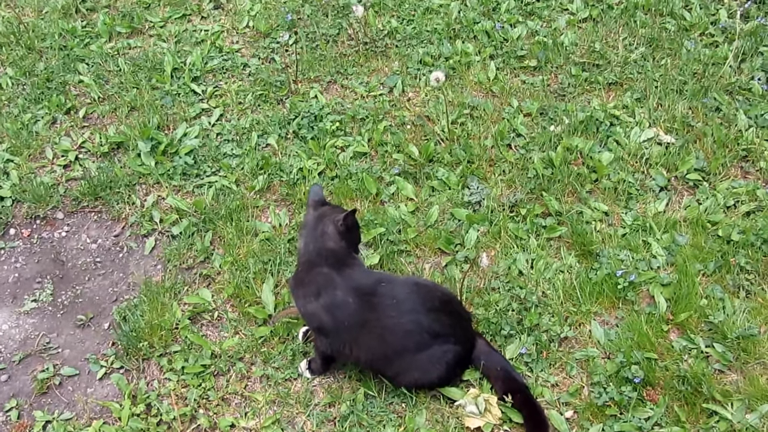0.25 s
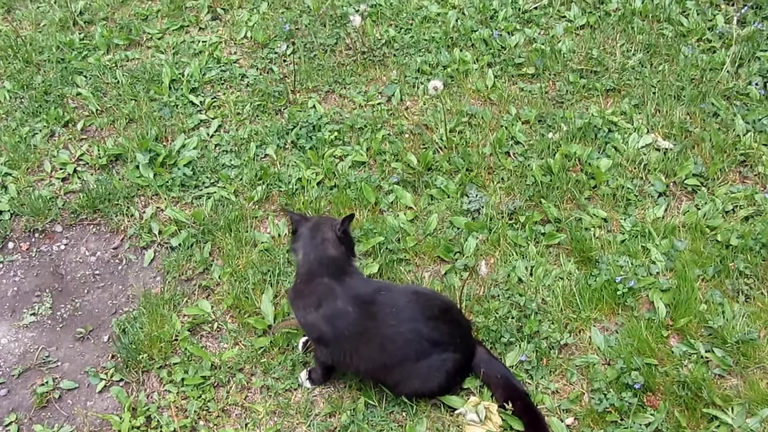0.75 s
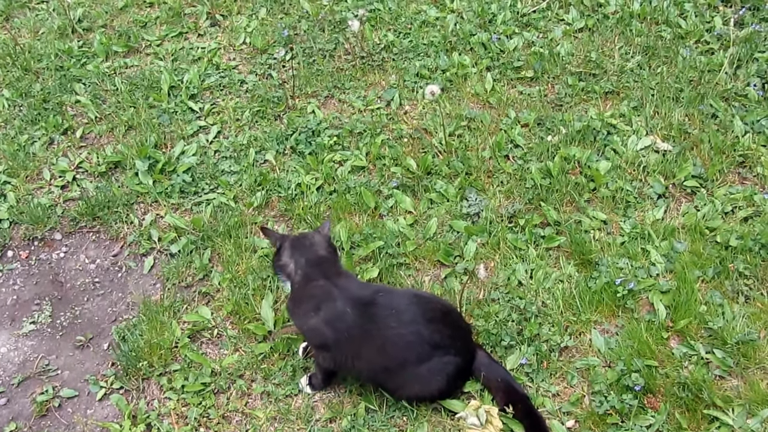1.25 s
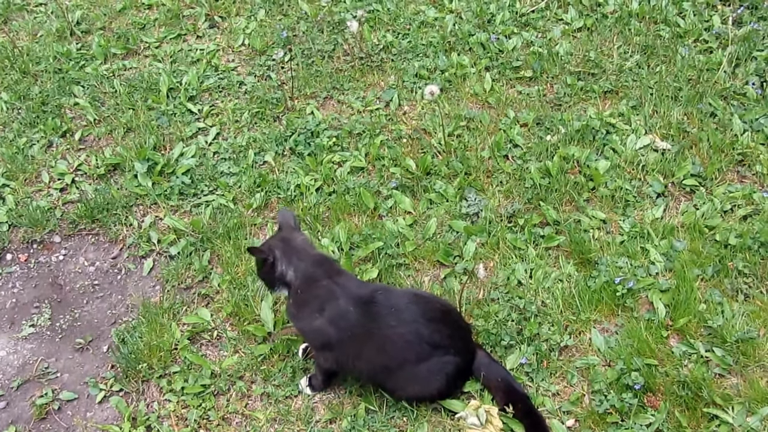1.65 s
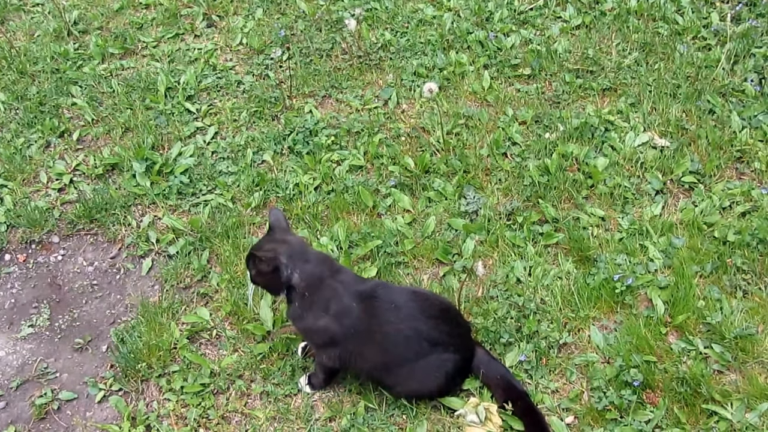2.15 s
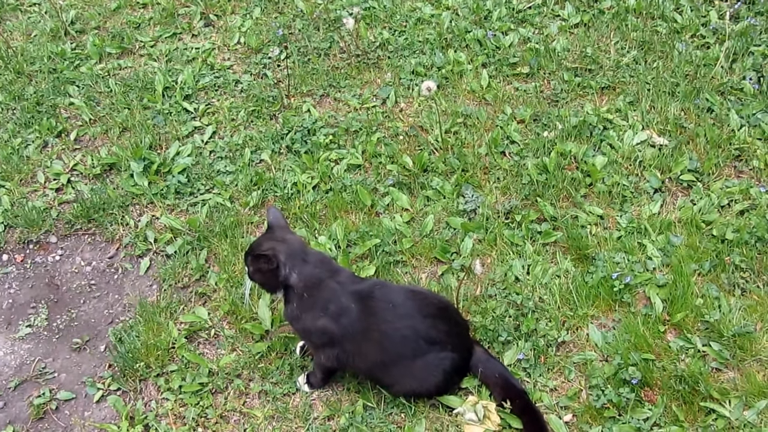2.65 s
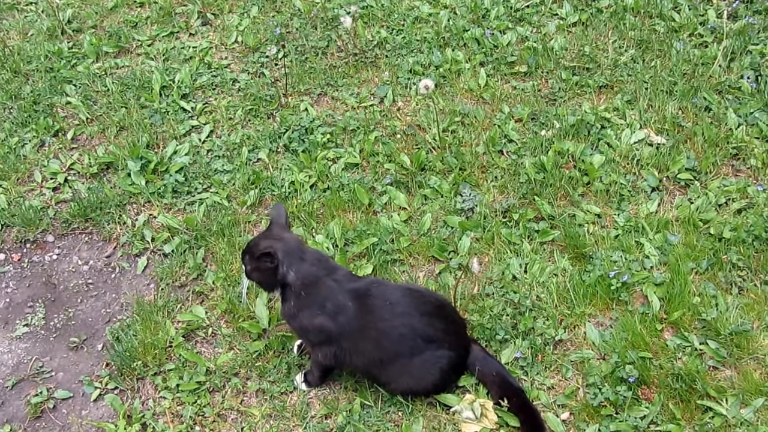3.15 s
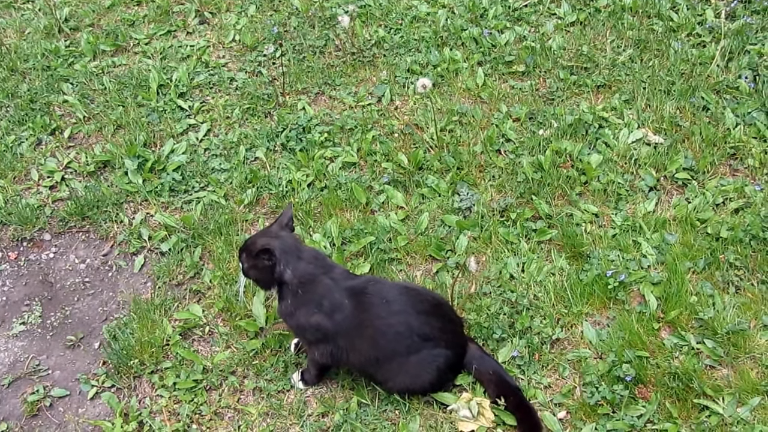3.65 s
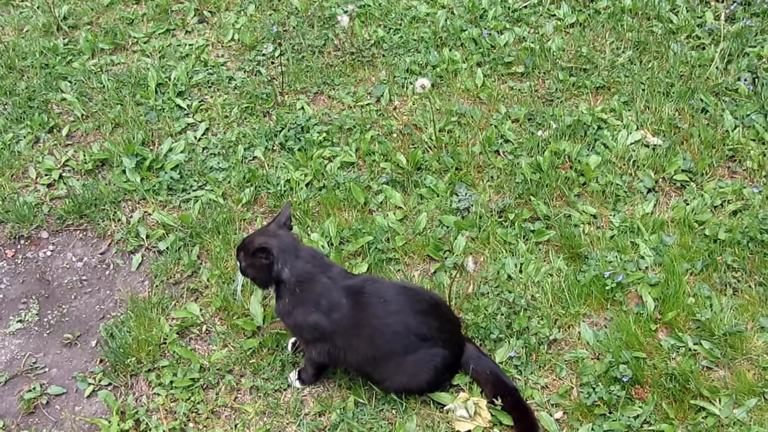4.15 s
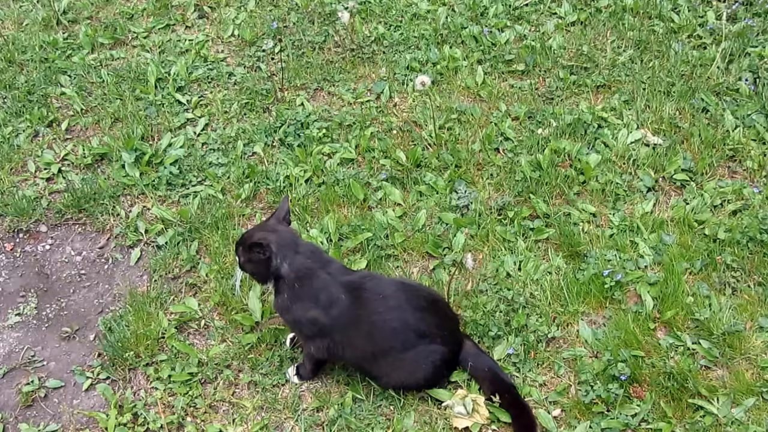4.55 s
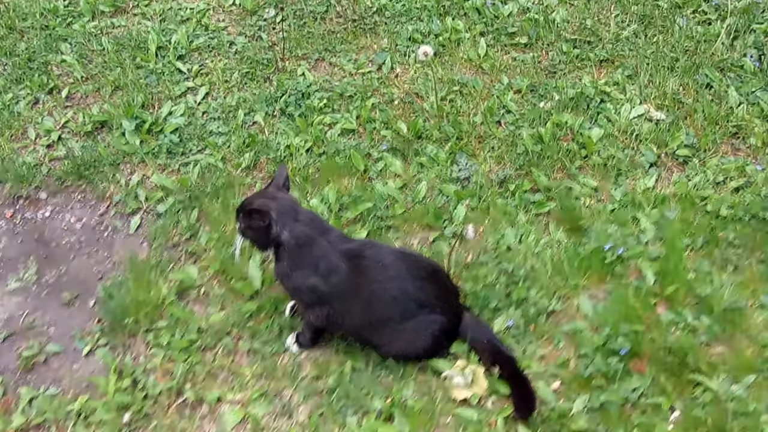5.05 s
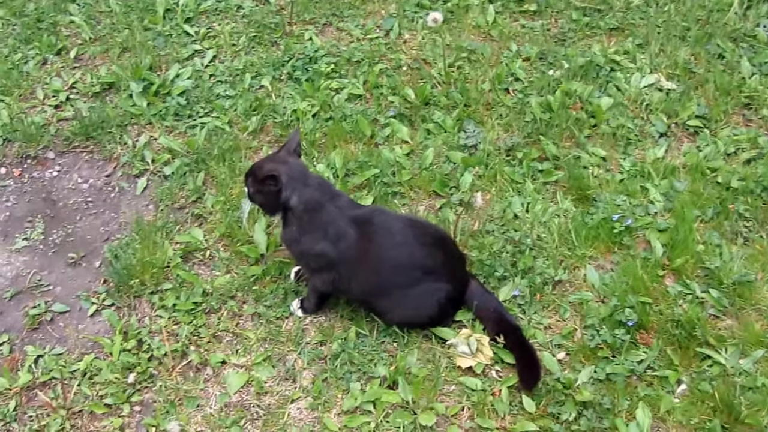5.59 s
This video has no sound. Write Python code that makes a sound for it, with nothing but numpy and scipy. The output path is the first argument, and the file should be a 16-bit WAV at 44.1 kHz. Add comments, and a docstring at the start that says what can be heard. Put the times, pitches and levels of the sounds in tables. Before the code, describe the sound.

Outdoors in a grassy garden, a big car engine some distance away throbs softly and unevenly, emerges more openly and brightly at about a second and a half, then settles into a steady deep boom. Soft tyre and traffic roar lies beneath it. Faint thin squeaks and small grassy rustles appear nearby. Stereo pickup from a small handheld device with close microphones.

```python
"""A soft roar of tyres and far traffic over low, still air, with the uneven burble of a big eight-cylinder engine.
The engine rolls along at idle some way from a garden; its firings are pulses that ring exhaust resonances.
It comes briefly into the open, then settles into a steadier boom, a cosine at the firing rate; belt-driven
tones waver above it. Faint squeaks, rustles and swells of hiss are shaped from noise.
All is heard through a closely spaced pair of microphone ports, as phase and level differences."""
import sys
import numpy as np
from scipy import signal
from scipy.fft import rfft, irfft
from scipy.io import wavfile
from scipy.ndimage import uniform_filter1d

SR = 44100
rng = np.random.default_rng(int(sys.argv[2]) if len(sys.argv) > 2 else 0)


def unload_audio(sound):
    """Save the sound as a 16-bit wav file, at the path given as the first command line argument."""
    columns = np.transpose(np.atleast_2d(sound))
    # keep every value between -1 and 1, then stretch to whole-number steps
    steps = np.round(np.clip(columns, -1, 1) * 32767)
    wavfile.write(sys.argv[1], SR, steps.astype(np.int16))


N = 256793
TIME = np.arange(N) / SR  # s
FREQS = np.maximum(np.arange(N // 2 + 1) * SR / N, 1)  # Hz, kept above 0 for logarithms

# In every swell, half_width_s runs from the peak to 13.5 % of it.
# Spectrum of the still air: frequency_hz, relative_density_db
AIR_COLOUR = [(20, -25.5), (38, -17), (55, -2.5), (100, 4), (160, 0.5), (230, -12), (420, -17.5),
              (1000, -28.5), (3500, -33.5), (5500, -41.5), (8000, -48), (10500, -58.5), (12000, -69),
              (15500, -69.5)]
AIR_DB = -33
# Spectrum of the hiss: frequency_hz, relative_density_db
HISS_COLOUR = [(2500, -19.5), (4000, 2.5), (5200, 4.5), (5650, 5.5), (6200, -3), (7800, -8), (9500, -25),
               (12000, -53.5)]
# Faint hiss, strongest while the car is in the open: centre_s, half_width_s, level_db
HISS_SWELLS = [(.15, 0.93, -64.5), (1.72, 0.35, -55), (2.9, 0.21, -61), (4.173, 0.34, -61.5),
               (4.638, 0.087, -61)]
# Rustles in the garden: centre_s, half_width_s, low_hz, high_hz, level_db
RUSTLES = [(4.745, .015, 3700, 4400, -56), (4.795, .025, 2300, 3000, -45), (5.0, .022, 2600, 3200, -44),
           (5.066, .046, 3280, 3760, -46.5), (5.08, .04, 2100, 2900, -41.5), (5.105, .012, 3600, 4000, -53),
           (5.15, .05, 3300, 3750, -54), (5.52, .02, 3350, 3700, -53), (5.6, .025, 3300, 4100, -51.5),
           (5.71, .018, 3300, 3750, -52.5)]
# Thin squeaks: centre_s, half_width_s, pitch_hz, width_hz of each of two resonances, level_db
SQUEAKS = [(1.702, 0.03, 5590, 130, -55), (1.74, .15, 5575, 50, -61.5), (1.795, 0.014, 5850, 380, -53),
           (2.05, .16, 3300, 350, -55), (2.94, 0.025, 5300, 250, -60), (3.035, 0.028, 2650, 330, -41),
           (3.73, .025, 2300, 250, -42)]

# Spectrum of tyres and traffic before shaping: frequency_hz, relative_density_db
ROAR_COLOUR = [(150, -6), (240, -7.5), (420, -4.5), (560, -0.5), (760, 0.5), (970, 3.5), (1300, 0),
               (1700, -6), (2050, -10.5), (2500, -10), (3200, -20), (4200, -35.5), (5600, -34), (8000, -64),
               (12000, -76.5)]
# Swells of the roar: centre_s, half_width_s, lift_db, treble_lift_db
ROAR_SWELLS = [(1.168, 0.4, 2.5, 0), (1.74, 0.32, 3.5, -1), (1.796, 0.088, 0.2, -1.5),
               (2.694, 0.054, 2.6, -1.5), (2.943, 0.21, 0.9, 3), (3.42, 0.13, 2, -0.5),
               (4.215, 0.31, 1.2, -1), (4.86, 0.22, 1.2, -0.5), (5.1, 1, 2, 2)]
# Resonant rings from one stretch of road to the next: centre_s, half_width_s, pitch_hz, width_hz, lift_db
ROAR_RINGS = [(.4, 1, 1640, 350, 2.2), (.7, 1.5, 234, 45, 8), (1.72, 0.3, 524, 130, 5),
              (1.79, 0.14, 1260, 360, 4.5), (2.248, .3, 348, 70, 4.5), (2.852, .55, 1305, 220, 3.5),
              (3.853, 0.67, 957, 110, 2), (3.9, 0.5, 2590, 402, 3.5), (4.935, 0.62, 1230, 270, 4),
              (5.508, .38, 690, 230, 3.5)]
# Path of the road noise: time_s, left_minus_right_db, cancelled_share (below 0 the ground reflection adds)
ROAD_PATH = [(0, 0.8, -1), (1.3, -1, 0.52), (1.75, 2.5, 0.075), (2.3, 1, 0.44), (4, -0.3, 0.57),
             (5.82, -1.5, 1)]
GROUND_DIP_HZ, GROUND_DIP_WIDTH_HZ = 391, 195
ROAR_DB, ROAR_FOLLOWS = -31, 0.78  # base level when nearest, share of the car's level swing

# Microphone ports: frequency_hz, left_lead_rad, left_minus_right_db, direct_power_share (0-1)
PORTS = [(56, 1.98, -2, 1), (90, 1.42, -1.5, 0.9), (164, 1.02, 2.5, 0.66), (310, 1.04, 2.5, 0.88),
         (464, 1.32, 2.5, 0.85), (610, 0.38, 5, 0.53), (920, 0.27, 5, 0.58), (1240, 1.5, 6, 0.24),
         (1750, 0.94, 4, 1), (2240, 1.41, -1, 0.7), (2680, 2.02, 4.5, 0.74), (4400, 2, 1.5, 0.2),
         (6140, 5.6, 3, 0.1), (8000, 3.1, 0.5, 0.13)]
# Wall echo of the burble: time_s, delay_s, level_db relative to the direct sound
WALL_ECHO = [(0, .0315, -15), (5.82, .0434, -16)]
NEAREST_S, PASS_S = 3.04, 2.06  # nearest point, time to cover its own distance from the garden

# Belt-driven fan and pumps: pitch_hz, relative_level_db when nearest, multiple of the car's level swing
BELT_TONES = [(47.0, -57, 1), (119.9, -38.5, 1), (141.4, -44, 1.5), (162, -52, 1), (192.7, -45, 1.5),
              (212, -55, 4), (260, -55, 2), (283.2, -46.5, 3.5), (298.6, -51, 3), (306, -54, 2.5),
              (353, -58, 2), (376.3, -61, 1)]
BELT_DB, SCREENED_DB = 0.5, -4  # offset of all belt tones, further offset while screened
EMERGE_S, EMERGE_LENGTH_S = 1.4, 0.16  # middle and time scale of coming into the open

# Engine speed: time_s, four_stroke_cycles_per_s
SPEED = [(0, 11.32), (.8, 11.32), (1.25, 11.45), (1.5, 11.41), (1.8, 11.25), (2.6, 11.225), (3.4, 11.19),
         (3.9, 11.155), (5.82, 11.155)]
# Strength of the eight firings of one cycle, in order: level_db
CYLINDER_DB = [-.5, -8.1, -3.5, -6.2, -3.4, -3.7, -8.4, -5.4]
FIRST_FIRING = .857  # cycles
# Hollow drone of the silencer, before its waver: time_s, level_db
DRONE = [(0, -49.5), (1.2, -49.5), (1.65, -36), (1.87, -43), (2.1, -38), (2.42, -37.5), (2.56, -50.5),
         (2.75, -40), (3.2, -39.5), (3.47, -52.5), (3.85, -38), (4.5, -58.5), (4.7, -39.5), (5, -56.5),
         (5.82, -48.5)]
DRONE_HZ, DRONE_WIDTH_HZ = 287, 30
# Exhaust resonances: pitch_hz, width_hz, relative_level_db, share of the brightness that lifts it
EXHAUST = [(109.5, 15, -3.1, 0), (146, 16, -12.6, .3), (151, 50, -11.4, 1), (192, 15, -11, 1.1)]
# Exhaust burble before a common offset: time_s, relative_level_db
BURBLE = [(0, -34), (.15, -39), (.26, -28), (.42, -39), (.53, -28.5), (.61, -30), (.7, -42.5), (.97, -39.5),
          (1.06, -30.5), (1.15, -32), (1.24, -39.5), (1.32, -30.5), (1.44, -30), (1.58, -21), (1.75, -23.5),
          (1.95, -24.5), (2.15, -26), (2.45, -30.5), (3.45, -28.5), (3.95, -31.5), (4.45, -26.5),
          (4.85, -32), (5.05, -28), (5.82, -29.5)]
BURBLE_DB, SILENCER_HZ = -0.5, 225  # common offset, silencer cutoff
OPEN_S, OPEN_HALF_WIDTH_S, OPEN_BRIGHT_DB = 1.68, 0.36, 7.5  # brightest in the open
BRIGHT_DB, TURN_S, DULLING_DB_PER_S = 1.2, 3.55, 4.5  # duller once the tailpipe turns away
# Hum: engine_order (multiple of the cycle rate), level_db relative to HUM_DB
HUM_ORDERS = [(5, 9.5), (6, -7.5), (7, -18)]
HUM_DB = -42.5  # reference when nearest
# Boom at the firing rate, before its waver: time_s, level_db
BOOM = [(0.1, -46), (0.2, -45), (0.42, -40), (0.65, -36), (0.74, -55), (0.88, -25), (0.96, -25),
        (1.05, -40), (1.17, -27), (1.3, -36), (1.55, -30.5), (2.0, -24), (2.6, -26), (3.3, -22),
        (3.75, -28), (4.4, -23), (4.9, -23.5), (5.3, -22), (5.8, -25.5)]
CUTOFF_HZ = 15700


def from_db(db):
    """Amplitude ratio: 20 dB is a factor of ten."""
    return 10 ** (np.asarray(db) / 20)


def rms_one(x):
    """Normalization by the root of the mean power."""
    return x / np.sqrt(np.mean(x ** 2) + 1e-20)


def levelled(x):
    """Short-term power normalization over 1/3 s, about four engine cycles; the throb within them stays."""
    return x / np.sqrt(np.abs(uniform_filter1d(x ** 2, size=SR // 3)) + 1e-20)


def in_time(rows):
    """Linear interpolation of a table's columns at every sample."""
    s, *columns = np.transpose(rows)
    return [np.interp(TIME, s, c) for c in columns]


def in_frequency(rows):
    """Interpolation of a table's columns along logarithmic frequency."""
    hz, *columns = np.transpose(rows)
    return [np.interp(np.log(FREQS), np.log(hz), c) for c in columns]


def swell(centre_s, half_width_s):
    """Gaussian envelope: a smooth rise and fall, 1 at its middle."""
    return np.exp(-2 * ((TIME - centre_s) / half_width_s) ** 2)


def drift(rate_hz):
    """Low-passed random fluctuation with rms 1."""
    white = rfft(rng.standard_normal(N))
    return rms_one(irfft(white / (1 + (FREQS / rate_hz) ** 2), N))


def resonance(x, hz, width_hz):
    """Two-pole resonance: damping sets the bandwidth; the peak gain is 1."""
    r = np.exp(-np.pi * width_hz / SR)
    zeros = np.array([1, 0, -1]) * (1 - r * r) / 2
    poles = [1, -2 * r * np.cos(2 * np.pi * hz / SR), r * r]
    return signal.lfilter(zeros, poles, x)


def nearness_db():
    """Inverse-square spreading along a straight road, 0 dB at the nearest point."""
    return -10 * np.log10(1 + ((TIME - NEAREST_S) / PASS_S) ** 2)


def ports(spectrum):
    """Interaural-like cues: phase lead and level difference between the ports vary with frequency."""
    lead_rad, balance_db, _ = in_frequency(PORTS)
    half = np.array([[1], [-1]]) / 2
    return irfft(spectrum * np.exp(1j * half * lead_rad) * from_db(half * balance_db), N)


def outdoor_noise(colour):
    """Partial coherence: shared direct noise plus independent scattered noise, rms 1."""
    direct = np.clip(in_frequency(PORTS)[2], 0, 1)
    white = rfft(rng.standard_normal((3, N)))
    field = np.sqrt(direct) * white[0] + np.sqrt(1 - direct) * white[1:]
    return rms_one(ports(field * from_db(in_frequency(colour)[0])))


def still_air():
    """Stationary broadband noise, weighted toward the bass."""
    return from_db(AIR_DB) * outdoor_noise(AIR_COLOUR)


def hiss(flutter_db):
    """Amplitude modulation of noise: soft swells flutter like a rustle."""
    level = sum(from_db(db) * swell(s, width) for s, width, db in HISS_SWELLS)
    return level * from_db(flutter_db * drift(35)) * outdoor_noise(HISS_COLOUR)


def rustles(grain_db, grain_hz):
    """Band-passed noise with random amplitude modulation: short, grainy brushes."""
    grain = rms_one(from_db(grain_db * drift(grain_hz)))
    white = rng.standard_normal(N) * grain
    out = np.zeros(N)
    for s, width, low, high, db in RUSTLES:
        band = signal.sosfilt(signal.butter(3, [low, high], "band", fs=SR, output="sos"), white)
        out += from_db(db) * swell(s, width) * rms_one(band)
    return out


def squeaks():
    """Selective resonance: noise through two narrow resonators gives each squeak its pitch."""
    out = np.zeros(N)
    for s, half_width, hz, width_hz, db in SQUEAKS:
        once = resonance(rng.standard_normal(N), hz, width_hz)
        whistle = rms_one(resonance(once, hz, width_hz))
        out += from_db(db) * swell(s, half_width) * whistle
    return out


def roar(bright_db, bright_hz, shimmer):
    """Interference and resonance in broadband tyre and traffic noise; the lawn reflection alters its low middle."""
    level_db = ROAR_DB + ROAR_FOLLOWS * nearness_db()
    treble_db = bright_db
    for s, width, lift_db, treble_lift_db in ROAR_SWELLS:
        level_db = level_db + lift_db * swell(s, width)
        treble_db = treble_db + treble_lift_db * swell(s, width)
    pan_db, cancelled = in_time(ROAD_PATH)
    noise = outdoor_noise(ROAR_COLOUR)
    treble = irfft(rfft(noise) / (1 + (bright_hz / FREQS) ** 8), N)
    coloured = noise + (from_db(treble_db) - 1) * treble
    coloured -= cancelled * resonance(noise, GROUND_DIP_HZ, GROUND_DIP_WIDTH_HZ)
    for s, half_width, hz, width_hz, db in ROAR_RINGS:
        coloured += (from_db(db) - 1) * swell(s, half_width) * resonance(noise, hz, width_hz)
    # moving air changes each band in its own time
    for hz in np.geomspace(600, 3600, 6):
        coloured += shimmer * drift(14.0) * resonance(noise, hz, hz / 3)
    return from_db(level_db + pan_db * [[.5], [-.5]]) * coloured


def engine_tone(cycle, level_db, waver_db, order):
    """Harmonic motion: a multiple of the cycle phase gives an almost pure tone."""
    amplitude = np.sqrt(2) * from_db(level_db + waver_db * drift(4))
    return -amplitude * np.cos(2 * np.pi * order * cycle)


def belt_tones(waver_db, wander_hz):
    """Beating of nearby frequencies: fan and pumps turn out of step with the firings."""
    # screened until the car comes into the open
    screen_db = SCREENED_DB * (1 - np.tanh((TIME - EMERGE_S) / EMERGE_LENGTH_S)) / 2
    out = np.zeros(N)
    for hz, db, follows in BELT_TONES:
        turns = np.cumsum(hz + wander_hz * drift(2.03)) / SR + rng.random()
        level_db = BELT_DB + db + screen_db + follows * nearness_db()
        out += engine_tone(turns, level_db, waver_db, order=1)
    return out


def firings(cycle, uneven_db, jitter_s, even_share):
    """Periodic impulsive excitation: firings vary in strength and timing, with most even flow removed."""
    cylinders = len(CYLINDER_DB)
    number = np.floor(cycle * cylinders).astype(int)
    at = np.flatnonzero(np.diff(number)) + 1
    chance = rng.standard_normal((len(at), 2))
    strength = from_db(np.array(CYLINDER_DB)[number[at] % cylinders] + uneven_db * chance[:, 0])
    shifted = at + (jitter_s * SR * chance[:, 1]).astype(int)
    pulses = np.zeros(N)
    pulses[np.clip(shifted, 0, N - 1)] = strength - even_share * np.mean(strength)
    return pulses


def puffs(pulses, rough, puff_s):
    """Turbulence noise: each pulse trails a decaying puff of gas; silencer and distance leave the lows."""
    fade = np.exp(-1 / (puff_s * SR))
    gas = signal.lfilter([np.sqrt(1 - fade ** 2)], [1, -fade], pulses)
    muffle = signal.butter(2, 900, fs=SR, output="sos")
    return signal.sosfilt(muffle, pulses + rough * gas * rng.standard_normal(N))


def drone(pulses, waver_db):
    """Cavity resonance: the silencer filters the puffs into a hollow drone that comes and goes."""
    once = resonance(pulses, DRONE_HZ, DRONE_WIDTH_HZ)
    hollow = resonance(once, DRONE_HZ, 2 * DRONE_WIDTH_HZ)
    return from_db(in_time(DRONE)[0] + waver_db * drift(3.4)) * levelled(hollow)


def burble(pulses):
    """Pipe resonance: the firings ring the exhaust, and the silencer rounds each beat by low-passing it."""
    open_db = OPEN_BRIGHT_DB * swell(OPEN_S, OPEN_HALF_WIDTH_S)
    bright_db = BRIGHT_DB + open_db - DULLING_DB_PER_S * np.maximum(TIME - TURN_S, 0)
    pulses = signal.sosfilt(signal.butter(2, 90, "high", fs=SR, output="sos"), pulses)
    pipe = np.zeros(N)
    for k, (hz, width_hz, db, share) in enumerate(EXHAUST):
        sign = (-1) ** k  # neighbouring resonances are opposite in phase
        pipe += sign * from_db(db + share * bright_db) * resonance(pulses, hz, width_hz)
    rounded = irfft(rfft(pipe) / np.sqrt(1 + (FREQS / SILENCER_HZ) ** 16), N)
    return from_db(in_time(BURBLE)[0] + BURBLE_DB) * levelled(rounded)


def with_wall(x):
    """Comb interference: a house-wall echo with a sliding delay makes single orders wax and wane."""
    delay_s, echo_db = in_time(WALL_ECHO)
    echo = from_db(echo_db)
    return (x + echo * np.interp(TIME - delay_s, TIME, x)) / np.sqrt(1 + echo ** 2)


def engine():
    """Common periodicity: boom, hum, burble and drone share the crank phase; belt tones turn independently."""
    cycle = np.cumsum(in_time(SPEED)[0]) / SR - FIRST_FIRING
    pulses = firings(cycle, uneven_db=.35, jitter_s=.00007, even_share=.9)
    boom = engine_tone(cycle, in_time(BOOM)[0], waver_db=.3, order=8)
    hum = sum(engine_tone(cycle, HUM_DB + nearness_db() + db, waver_db=-1.0, order=round(order))
              for order, db in HUM_ORDERS)
    exhaust = with_wall(burble(puffs(pulses, rough=.12, puff_s=.005)))
    silencer = drone(puffs(pulses, rough=1.47, puff_s=0.056), waver_db=-1.5)
    return boom + hum + exhaust + silencer + belt_tones(waver_db=3.5, wander_hz=0.34)


def scene():
    """Superposition of still air, hiss and road noise with the engine and small sounds."""
    ease = np.minimum(np.minimum(TIME, TIME[-1] - TIME) / .004, 1)  # 4 ms fades at both ends
    background = still_air() + hiss(flutter_db=2.0) + roar(bright_db=0.4, bright_hz=1820, shimmer=0.034)
    small_sounds = rustles(grain_db=2, grain_hz=130) + squeaks()
    return background + ports(rfft(ease * engine() + small_sounds))


def record(dry):
    """Band limitation: a steep low-pass filter cuts the top."""
    return signal.sosfilt(signal.cheby2(12, 70, CUTOFF_HZ, fs=SR, output="sos"), dry)


dry = scene()
out = record(dry)
unload_audio(out)
```